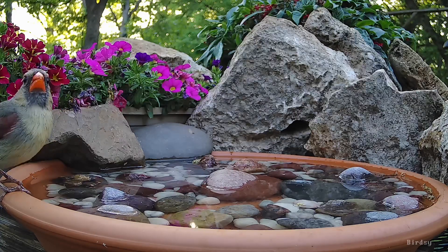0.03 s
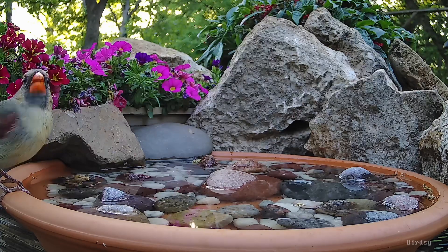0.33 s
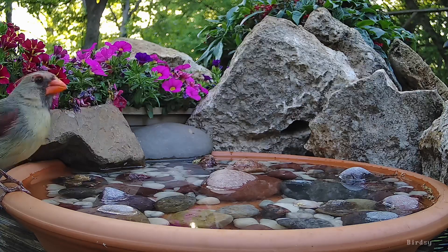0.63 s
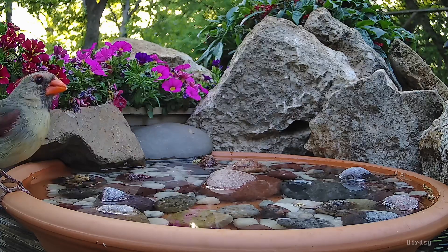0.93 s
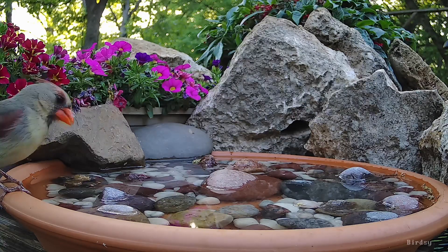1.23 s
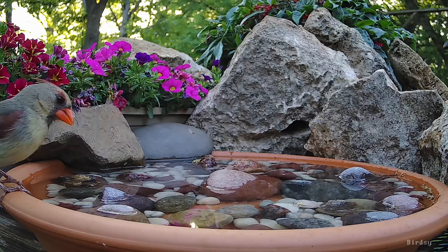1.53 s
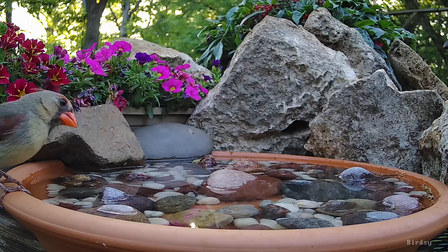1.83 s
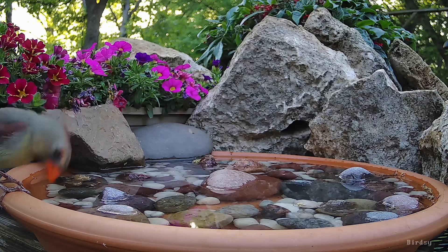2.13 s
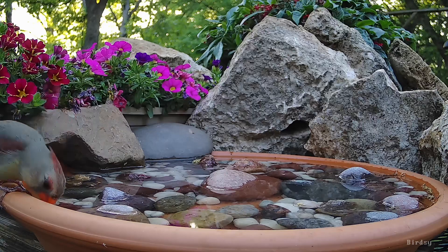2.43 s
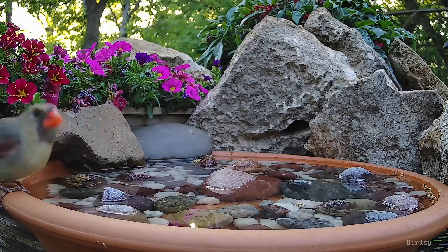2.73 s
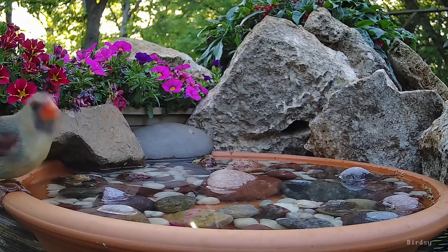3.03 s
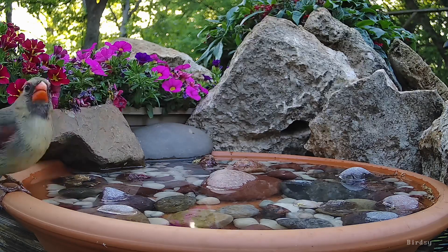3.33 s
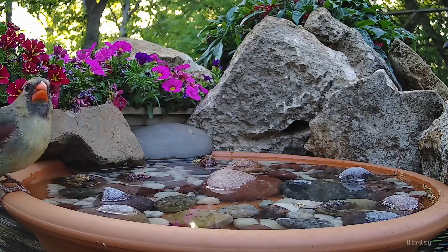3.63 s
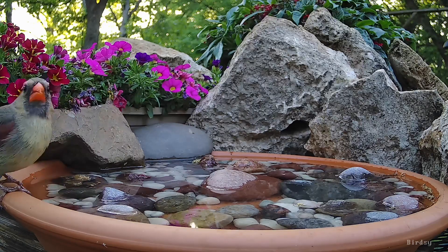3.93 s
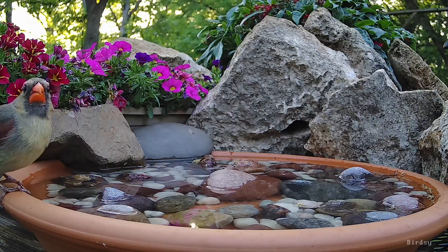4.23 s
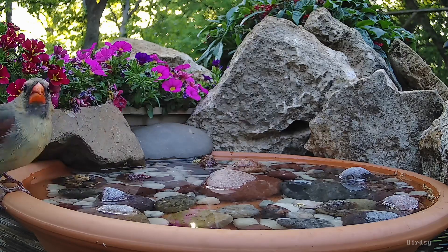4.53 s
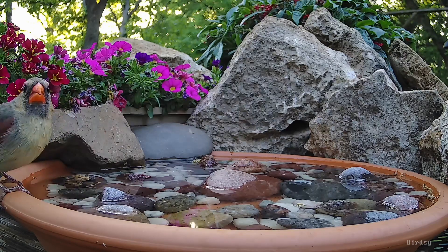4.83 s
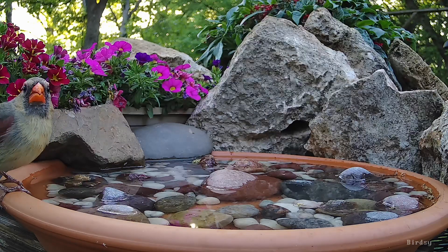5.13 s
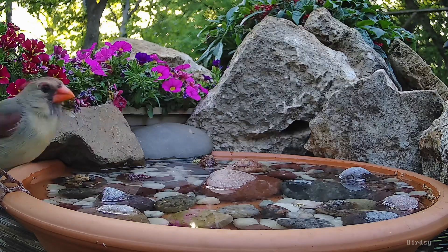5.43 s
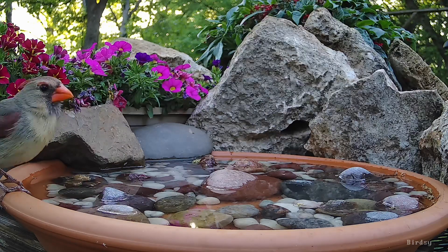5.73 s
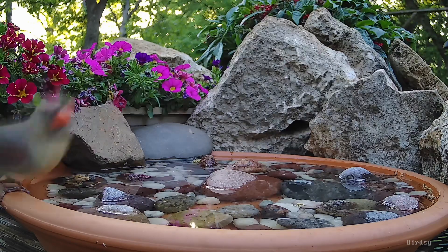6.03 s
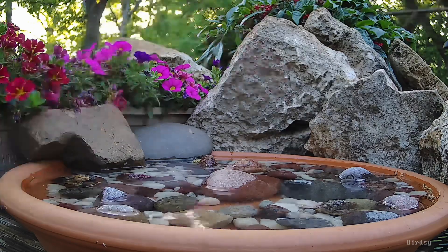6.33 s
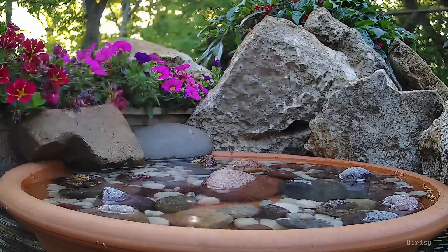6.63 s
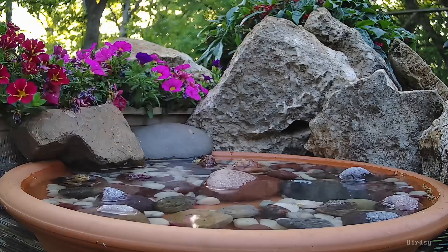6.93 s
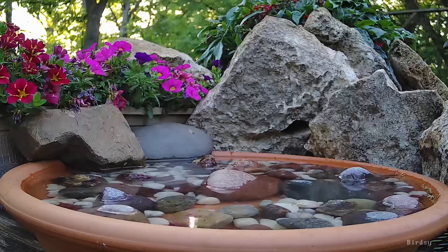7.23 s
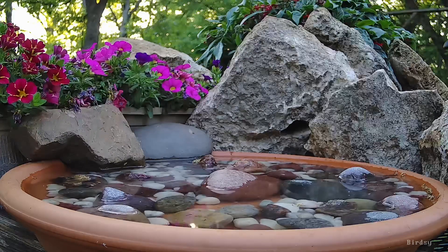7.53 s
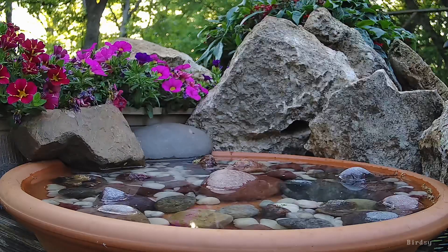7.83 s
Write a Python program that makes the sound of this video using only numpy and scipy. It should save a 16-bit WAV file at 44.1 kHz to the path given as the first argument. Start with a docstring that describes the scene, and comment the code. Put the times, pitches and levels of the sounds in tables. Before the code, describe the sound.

A cardinal at a garden birdbath gives two sharp, very high chips close to the microphone, pauses for about three seconds, then gives two more. Much fainter chips come in between. It then takes off right beside the listener with a quick burst of thumping, swishing wingbeats, followed by two faint flutters further away. Distant traffic and a low engine drone sit quietly underneath.

```python
"""A cardinal on the rim of a garden birdbath gives sharp rising chips, quick flicks of its voice organ,
and another answers from the trees. Distant traffic, a droning engine and a thin high hiss lie behind them,
and from 2.3 s far birds whistle faintly. At 6.1 s the cardinal takes off right beside the listener:
its wings push air and thump, and its feathers swish and rustle. It flutters twice more further away,
and just before the end a low rush sets in."""
import sys
import numpy as np
from scipy import signal
from scipy.fft import rfft, irfft, next_fast_len
from scipy.io import wavfile
from scipy.ndimage import uniform_filter1d

SR = 44100
rng = np.random.default_rng(int(sys.argv[2]) if len(sys.argv) > 2 else 0)


def log_audio(samples):
    """Write samples as a 16-bit WAV file to the path given in sys.argv[1]."""
    # one column per channel
    frames = np.atleast_2d(samples).T
    # limit to full scale, then quantise
    limited = np.clip(frames, -1, 1)
    pcm = np.round(limited * 32767).astype(np.int16)
    wavfile.write(sys.argv[1], SR, pcm)


N = 357121
TIME = np.arange(N) / SR

# The cardinals' chips. Each row: start in seconds, direct level in dB, start and end pitch in Hz,
# length in seconds, octave against the note in dB, rock echo in dB, garden echo in dB.
# All levels are before filtering.
CARDINAL_CHIPS = [ (0.0813, -43.5, 6030, 8390, .013, -13, -47, -45.5),
                  (0.391, -12, 6100, 8100, 0.012, -7, -23, -39.5),
                  (1.1678, -15, 6400, 7920, 0.01, -10, -46, -46),
                  (1.3790, -63.5, 6230, 7920, .012, -25, -63.5, -49),
                  (2.89, -45, 6050, 8000, .012, -5, -62.5, -47),
                  (3.6698, -47, 6400, 7986, 0.0099, -6, -48.5, -48.5),
                  (4.4511, -9, 6150, 7990, .011, -5, -45.5, -41),
                  (5.0283, -46.5, 6200, 7580, .011, -4.5, -47, -42.5),
                  (5.3812, -7, 6160, 7690, 0.012, -12.5, -36, -42),
                  (6.6970, -33.5, 6670, 8040, 0.015, -24, -41.5, -44),
                  (7.465, -57, 6800, 7900, .013, -25, -57.5, -57)]
# Bursts of wingbeats. Each row: start, end, delay that the later beats build up and time of closest
# pass, all in seconds; base levels of push, whump and swish in dB; swish width in seconds; rustle in dB.
WING_BURSTS = [ (6.139, 6.484, .009, 6.25, -14.5, -29, -46, .0048, -47.5),
               (6.663, 6.82, 0, 6.72, -40, -50, -62.5, 0.0097, -68.5),
               (7.754, 7.779, 0, 7.75, -35.5, -62, -72, 0.013, -80)]
# Powers of distance by which the wing sounds fade, in this order: push, whump, swish, rustle.
WING_FALLOFF = (3.5, 1.05, 1.66, 1.8)
# The bird jerks and knocks the rim. Each row: time in seconds, level in dB.
RIM_KNOCKS = [(5.388, -57)]
# Birds far off. Each row: time in seconds, pitch in Hz, level in dB.
FAR_WHISTLES = [(2.33, 1900, -71), (5.04, 2560, -79), (5.36, 2626, -80), (6.61, 2603, -78),
                (7.05, 3160, -81.5), (7.59, 2677, -80), (7.70, 2306, -79)]
# The far engine. Each row: time in seconds, firings per second, level in dB.
ENGINE_COURSE = [(0.0, 68.6, -51), (0.11, 65.63, -52), (0.9, 65.6, -52), (1.19, 59.77, -57.5),
                 (1.25, 58.26, -47), (1.52, 47.15, -54), (1.55, 46.8, -47), (2.11, 43.94, -51.5),
                 (2.89, 44.1, -44.5), (3.4, 46.67, -55.5), (4.03, 54.7, -51.5), (4.52, 58.1, -57.5),
                 (5.7, 56.8, -57.5)]
# Spells of thin high hiss. Each row: start in seconds, end in seconds.
THIN_HISS_SPELLS = [(-.2, 1.5), (2.0, 3.85), (5.0, 8.05)]
# Tone colours of the noises. Each row: frequency in Hz, relative strength there in dB.
SWISH_COLOUR = [(150, -0.5), (380, 3.5), (700, 4), (850, -3), (1200, -5), (1600, -11.5), (2500, -10),
                (4000, -18.5), (5500, -27), (10000, -26), (15000, -35)]
SIZZLE_COLOUR = [(1500, -12), (3000, 1), (5000, 1), (8000, -4), (14000, -5)]
FEATHER_COLOUR = [(60, 10), (120, 21), (220, 6), (450, 2), (1200, 1.5), (1600, -9.5), (2600, -8),
                  (4500, -11.5), (8000, -15.5), (14000, -18)]
TYRE_COLOUR = [(20, 13), (45, 15), (70, 12), (120, 5), (200, 3.5), (350, -5), (550, -4), (1000, 1),
               (1300, -2.5), (1700, -10.5), (2600, -16.5), (4000, -27.5), (8000, -43.5)]
RUMBLE_COLOUR = [(15, -2), (35, 1), (55, -1), (85, -7.5), (120, -5), (170, -16), (250, -17.5), (400, -29),
                 (900, -54)]
RUSH_COLOUR = [(30, 14), (80, 21.5), (200, 9.5), (400, -1.5), (1100, 2), (1700, -7), (2600, -13.5),
               (4000, -24.5), (9000, -43)]
FINE_HISS_COLOUR = [(100, 3.5), (2500, 1), (3600, 1.5), (5500, 0), (9000, 0.5), (11000, 0.5), (14000, -2),
                    (15000, -11.5)]

CHIP_LOUDEST = 0.44  # share of its length at which a chip peaks
THROAT_HZ = 5500  # the bird's throat cuts off lower sound
GARDEN_ECHO_S, ROCKS_ECHO_S = 0.35, .075  # time to die away by 60 dB
BEAT_S, PASS_S = .045, 0.13  # one wingbeat; time to fly as far as the closest distance
LEAP_S, LEAP_PUSH_DB, LEAP_SWISH_DB = 6.122, -28, -51  # the wings unfold
SPREAD_BEATS, SPREAD_EASE_BEATS = 2.68, 0.38  # strokes open from cramped to full around this beat
PUSH_WIDTH_S, FLICK_LAG_S = (0.0059, 0.00755), (0.0166, .0272)  # each pair: cramped stroke, full stroke
SPREAD_WHUMP_DB, SPREAD_SWISH_DB = -5.5, 1.5  # full strokes thump less and swish more
WHUMP_HZ, WHUMP_LEAD_S = 170.1, 0.00801  # the whump comes just before the feathers flick
SUCTION_DB, SIZZLE_DB, SIZZLE_LAG_S = 19, -10, .002  # levels are against the swish
RETURN_S, RETURN_DB = 0.03, -15  # cramped wings also push air on the way back up
RUSTLE_LEAD_S, RUSTLE_LAG_S = 0.029, .012  # feathers rub before and after a burst
HUSH_DB, HUSH_LEAD_S = -3.5, .002  # the rustle ebbs while the wing is spread on the downstroke
ROAD_DB, ROAD_FADE_DB_PER_S, ROAD_FAR_DB = -57, -1.13, -63


def chip(start_hz, end_hz, length_s, octave_db):
    """One upward flick of the bird's voice organ that levels off; it opens with a rasp and an octave."""
    progress = np.linspace(0, 1, int(length_s * SR))
    size = len(progress)
    rise = 1 - np.exp(-(progress / 0.43) ** 2.1)
    phase = 2 * np.pi * np.cumsum(start_hz + (end_hz - start_hz) * rise) / SR
    skew = np.log(.5) / np.log(CHIP_LOUDEST)
    loudness = np.abs(np.sin(np.pi * progress ** skew)) ** 1.5
    octave = undb(octave_db) * bell(progress - .245, width=.11)
    rasp = undb(-15.5 + octave_db) * bell(progress - .1, 0.064) * band(hz=9400, width_hz=4000)[-size:]
    growl = undb(-28) * bell(progress - .2, 0.076) * band(hz=5650, width_hz=600)[-size:]
    return loudness * (np.sin(phase) + octave * np.sin(2 * phase) + rasp + growl)


def cardinals():
    """Each chip arrives directly, bounces off nearby rocks and is scattered by the leaves."""
    direct, rocks, leaves = np.zeros((3, N))
    for s, db, start_hz, end_hz, length_s, octave_db, rocks_db, garden_db in CARDINAL_CHIPS:
        note = chip(start_hz, end_hz, length_s, octave_db)
        add(direct, s, undb(db) * note)
        add(rocks, s, undb(rocks_db) * echo(note, ROCKS_ECHO_S, build_s=.0015))
        add(leaves, s, undb(garden_db) * echo(note, GARDEN_ECHO_S, build_s=.012))
    direct = signal.sosfilt(signal.butter(12, THROAT_HZ, "high", fs=SR, output="sos"), direct)
    # a narrow dip in the direct path splits each sweep in two
    direct = direct - 0.72 * ring(direct, hz=6940, width_hz=260)
    # the echoes carry mostly the top of the sweep; leaves and air soak up the octave
    rocks = undb(1.5) * passband(rocks, low_hz=7250, high_hz=10500)
    return direct + rocks + passband(leaves, low_hz=6450, high_hz=11000)


def wings():
    """Every downstroke pushes air at the listener; the wing turns with a whump and its feathers swish."""
    air = undb(LEAP_PUSH_DB) * puff(TIME - LEAP_S, width_s=.0045)
    swish = undb(LEAP_SWISH_DB) * bell(TIME - LEAP_S, 0.0053)
    rustle, sizzle, hush = np.zeros((3, N))
    half_s = .05  # each short shape starts this long before its centre
    t = np.arange(-half_s, half_s, 1 / SR)
    # the wing snaps taut: little more than one low cycle
    whump = np.sin(2 * np.pi * WHUMP_HZ * t) * bell(t, 0.0019)
    # the upstroke sucks air away as the feathers part
    suction = -undb(SUCTION_DB) * bell(t - .003, .0033)
    for first_s, end_s, delay_s, closest_s, push_db, whump_db, swish_db, swish_s, rustle_db in WING_BURSTS:
        for beat, even_s in enumerate(np.arange(first_s, end_s, BEAT_S)):
            beat_s = even_s + delay_s * (1 - np.exp(-beat / 0.78))
            spread = 1 / (1 + np.exp((SPREAD_BEATS - beat) / SPREAD_EASE_BEATS))  # 0 cramped, 1 full
            away = distance(beat_s, closest_s)
            levels_db = [push_db, whump_db + spread * SPREAD_WHUMP_DB, swish_db + spread * SPREAD_SWISH_DB]
            push_gain, whump_gain, swish_gain = undb(levels_db) / away ** np.array(WING_FALLOFF[:3])
            push_s = beat_s - half_s
            flick_s = push_s + np.interp(spread, (0, 1), FLICK_LAG_S)
            add(air, push_s, push_gain * puff(t, np.interp(spread, (0, 1), PUSH_WIDTH_S)))
            add(hush, push_s - HUSH_LEAD_S, bell(t, 0.0064))
            add(air, flick_s - WHUMP_LEAD_S, whump_gain * whump)
            add(air, flick_s, swish_gain * suction)
            add(swish, flick_s, swish_gain * bell(t, swish_s))
            add(sizzle, flick_s + SIZZLE_LAG_S, spread * swish_gain * bell(t, .006) / away ** 2)
            add(air, push_s + RETURN_S, (1 - spread) * undb(push_db + RETURN_DB) * puff(t, 0.003))
        airborne = gate(first_s - RUSTLE_LEAD_S, end_s + RUSTLE_LAG_S, fade_s=.012)
        rustle += undb(rustle_db) * airborne / distance(TIME, closest_s) ** WING_FALLOFF[3]
    # fill the loudness shapes with noise; the sizzle is the bright edge of each swish
    sizzle *= undb(SIZZLE_DB) * noise(SIZZLE_COLOUR)
    swish *= undb(2.0 * drift(400)) * noise(SWISH_COLOUR)
    rustle *= undb(HUSH_DB * hush) * feathers()
    return air + swish + sizzle + rustle


def feathers(catches_per_s=300, scrape_s=0.0017):
    """Feathers rub in an uneven rustle, with small scrapes as the quills catch on each other."""
    catches = (rng.random(N) < catches_per_s / SR) * rng.random(N)
    fading_catches = signal.lfilter([1], [1, -np.exp(-1 / (scrape_s * SR))], catches)
    scrapes = fading_catches * band(hz=3000, width_hz=4900)
    return undb(2.04 * drift(180)) * noise(FEATHER_COLOUR) + undb(-14) * unit(scrapes)


def rim_knock():
    """A brief dull thud of the bath under the bird's feet."""
    return sum(undb(db) * bell(TIME - s, .004) for s, db in RIM_KNOCKS) * band(hz=330, width_hz=400)


def far_birds():
    """Short soft whistles, blurred by the trees."""
    out = np.zeros(N)
    half_s = .07
    t = np.arange(-half_s, half_s, 1 / SR)
    for s, hz, db in FAR_WHISTLES:
        add(out, s - half_s, undb(db) * bell(t, .018) * band(hz, width_hz=200.5)[-len(t):])
    return out


def engine():
    """A far engine slows and picks up again; mostly its lowest note carries."""
    times, rates, levels = np.transpose(ENGINE_COURSE)
    firing_hz = np.interp(TIME, times, rates) * (1 + .012 * drift(12))
    phase = 2 * np.pi * np.cumsum(firing_hz) / SR
    loudness = undb(np.interp(TIME, times, levels) + 1.6 * drift(9))
    return loudness * np.sqrt(2) * (np.sin(phase) + undb(-16) * np.sin(2 * phase))


def traffic():
    """Distant tyre roar recedes to a steady level over a low rumble."""
    road_db = np.maximum(ROAD_DB + ROAD_FADE_DB_PER_S * TIME, ROAD_FAR_DB)
    tyres = undb(road_db + .5 * drift(6.2)) * noise(TYRE_COLOUR)
    return tyres + undb(-54.5 + 1.2 * drift(5.7)) * noise(RUMBLE_COLOUR)


def hiss_and_rush():
    """A thin hiss comes and goes over a steady fine one; a low rush sets in near the end."""
    spells = sum(gate(start_s, end_s, fade_s=.3) for start_s, end_s in THIN_HISS_SPELLS)
    thin = spells * undb(-84.5 + .9 * drift(18)) * band(hz=4370, width_hz=390)
    rush = undb(-52.5) * gate(start_s=7.86, end_s=np.inf, fade_s=0.028) * noise(RUSH_COLOUR)
    return thin + rush + undb(-75) * noise(FINE_HISS_COLOUR)


def echo(x, decay_s, build_s):
    """A sound thrown back by many small surfaces: the echo swells, then dies."""
    t = np.arange(SR // 2) / SR
    bounces = rng.standard_normal(len(t)) * (1 - np.exp(-t / build_s))
    bounces *= np.exp(-np.log(1000) * t / decay_s)
    return signal.fftconvolve(x, bounces / np.sqrt(np.sum(bounces ** 2)))


def puff(t, width_s):
    """Air pressure that rises between two dips of suction."""
    return (1 - (t / width_s) ** 2) * bell(t, width_s)


def distance(s, closest_s):
    """Distance of the flying bird, as a multiple of its closest."""
    return np.hypot(1, (s - closest_s) / PASS_S)


def noise(colour):
    """Noise of strength 1 with the given tone colour."""
    hz, db = np.transpose(colour)
    size = next_fast_len(N)
    bins_hz = np.arange(size // 2 + 1) * SR / size
    gains = undb(np.interp(np.log(bins_hz + 1), np.log(hz), db))
    return unit(irfft(rfft(rng.standard_normal(size)) * gains, size)[:N])


def band(hz, width_hz):
    """Noise of strength 1 gathered around one pitch."""
    return unit(ring(ring(rng.standard_normal(N), hz, width_hz), hz, width_hz))


def ring(x, hz, width_hz):
    """A resonance: passes one pitch fully and weakens the rest."""
    return signal.lfilter(*signal.iirpeak(hz, hz / width_hz, fs=SR), x)


def passband(x, low_hz, high_hz):
    """A steep cut below and a gentle loss of treble above."""
    steep = signal.butter(8, low_hz, "high", fs=SR, output="sos")
    gentle = signal.butter(2, high_hz, fs=SR, output="sos")
    return signal.sosfilt(np.vstack([steep, gentle]), x)


def drift(turns_per_s):
    """Smooth random wandering, about 1 in size."""
    step = int(SR / turns_per_s)
    stairs = np.repeat(rng.standard_normal(N // step + 1), step)
    return unit(uniform_filter1d(stairs, step)[:N])


def gate(start_s, end_s, fade_s):
    """1 between two times, with a straight fade centred on each."""
    return np.clip(np.minimum(TIME - start_s, end_s - TIME) / fade_s + .5, 0, 1)


def bell(t, width):
    """A smooth bump around t = 0."""
    return np.exp(-.5 * (t / width) ** 2)


def add(out, start_s, x):
    """Mix a short sound in at a time."""
    i = int(start_s * SR)
    out[i:i + len(x)] += x[:N - i]


def undb(db):
    """Turn decibels into a multiplier."""
    return 10 ** (np.asarray(db) / 20)


def unit(x):
    """Scale to an average strength (rms) of 1."""
    return x / np.sqrt(np.mean(x ** 2))


def scene():
    """The birds and their surroundings in one channel."""
    birds = cardinals() + rim_knock() + far_birds() + wings()
    return (birds + engine() + traffic() + hiss_and_rush())[None]


def record(dry, top_hz=14800):
    """Cut away the very highest treble."""
    return signal.sosfilt(signal.ellip(8, .2, 70, top_hz, fs=SR, output="sos"), dry)


dry = scene()
out = record(dry)
log_audio(out)
```